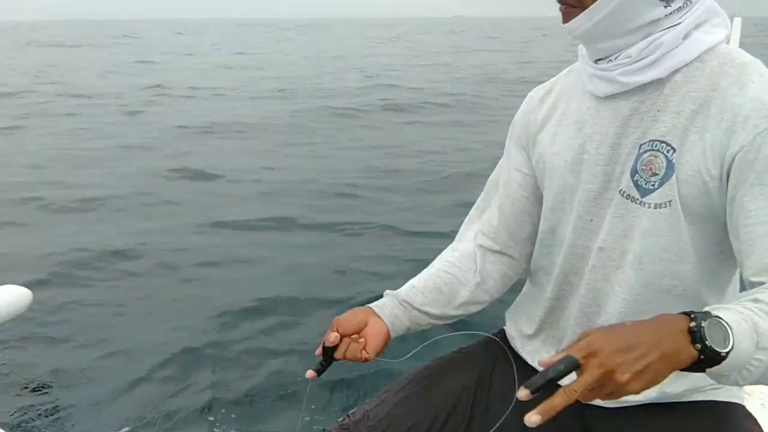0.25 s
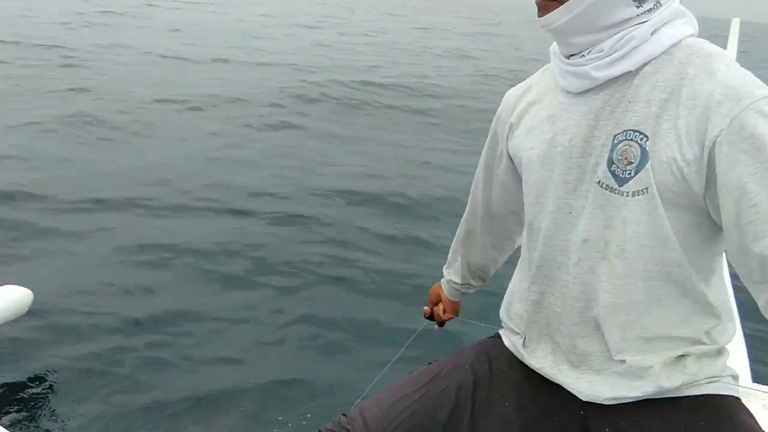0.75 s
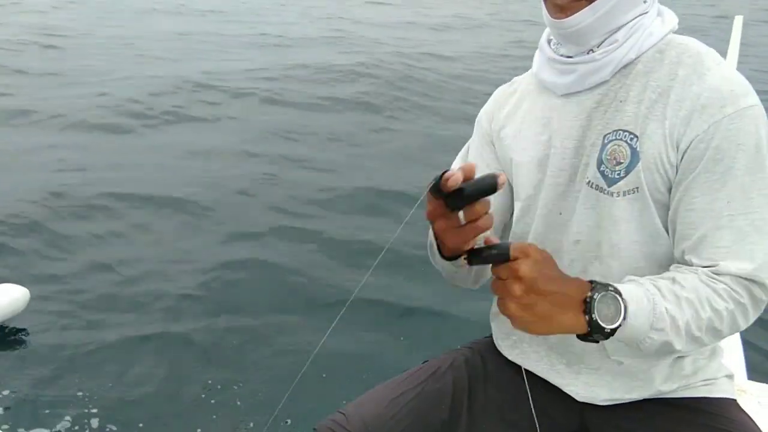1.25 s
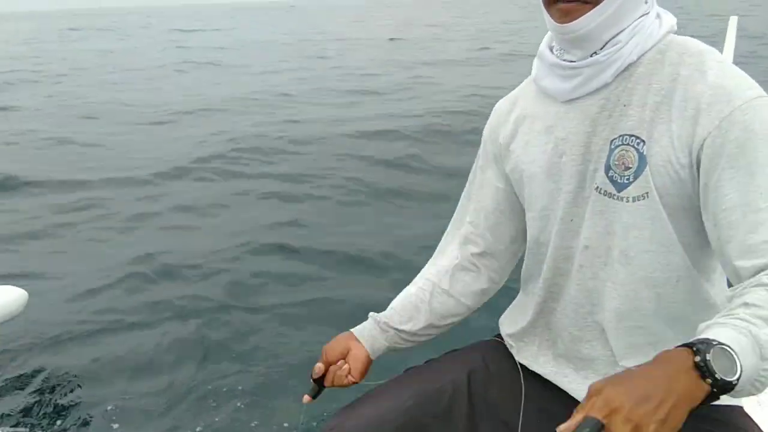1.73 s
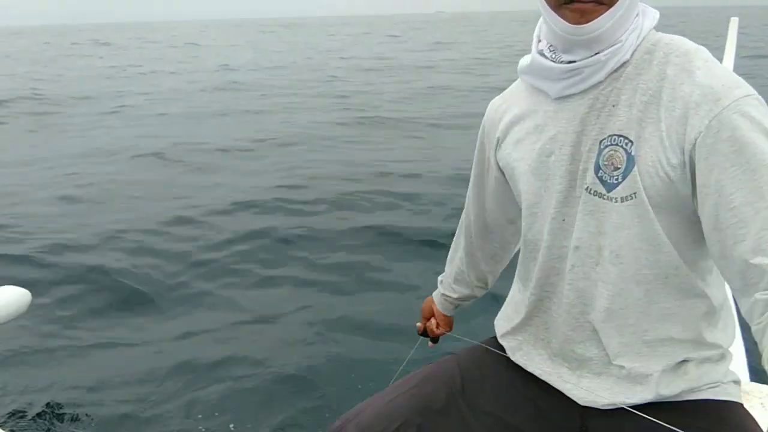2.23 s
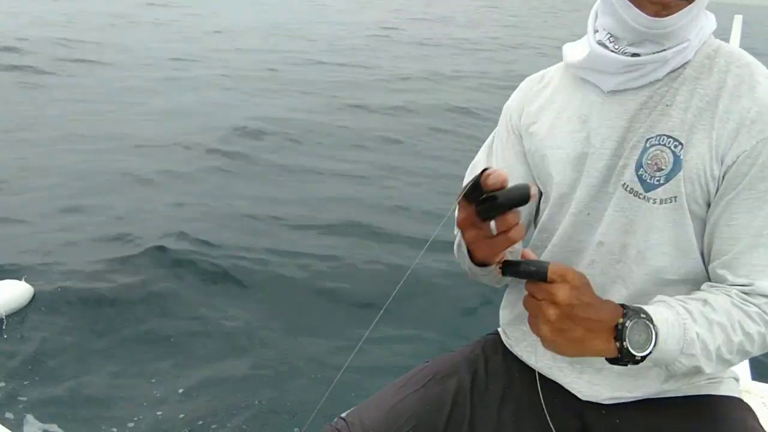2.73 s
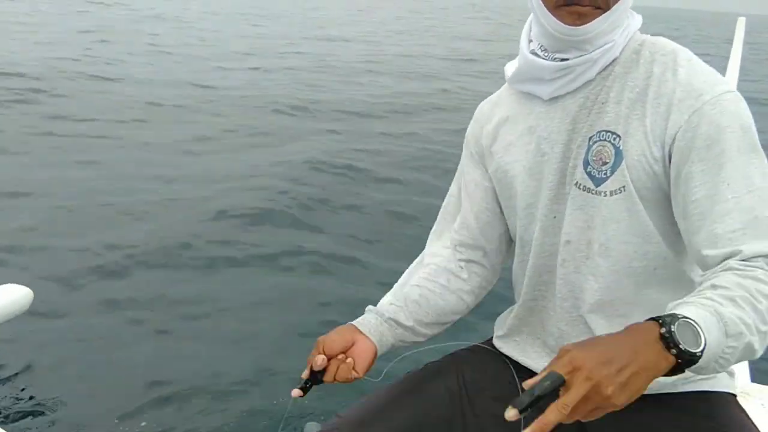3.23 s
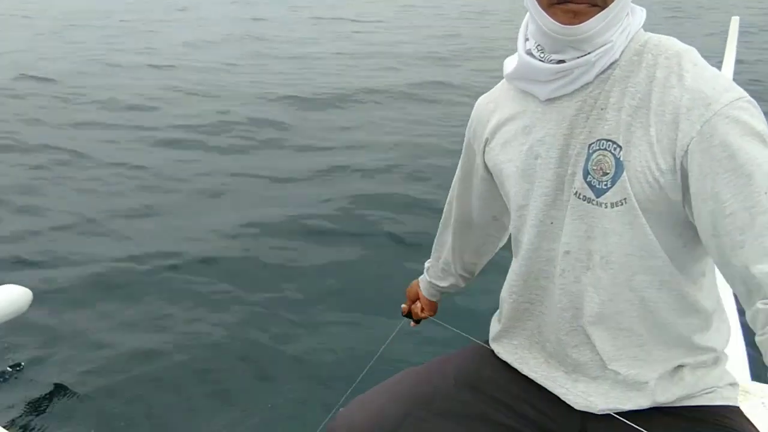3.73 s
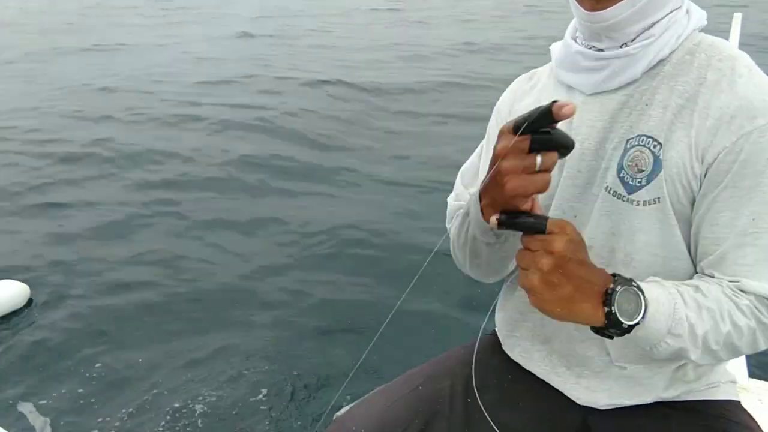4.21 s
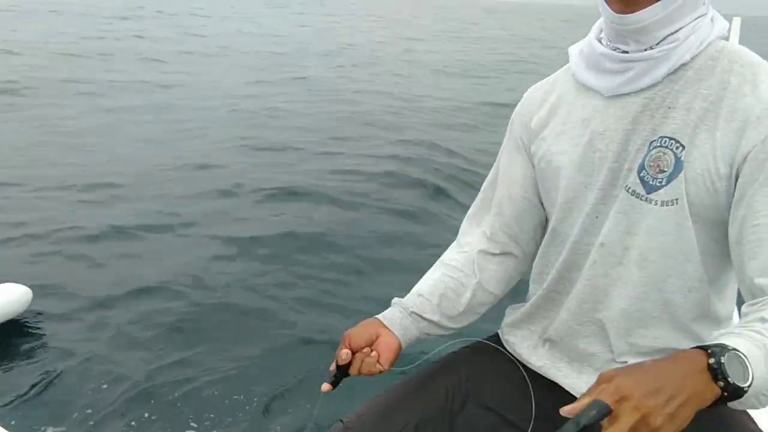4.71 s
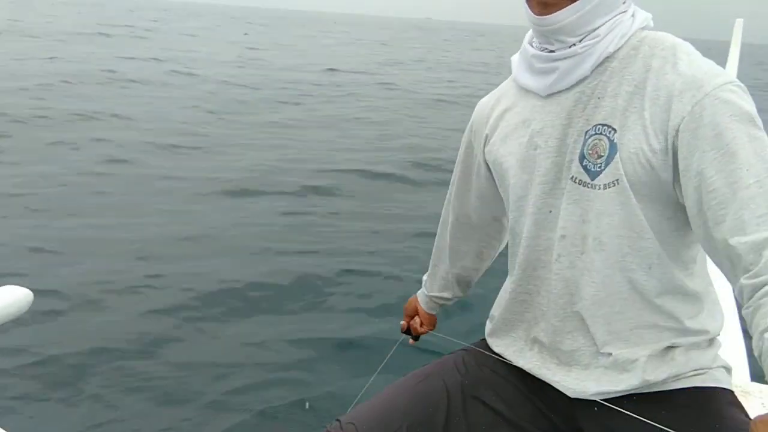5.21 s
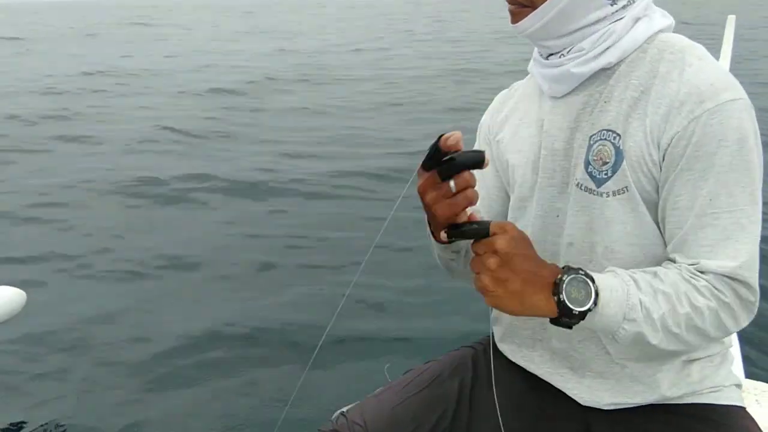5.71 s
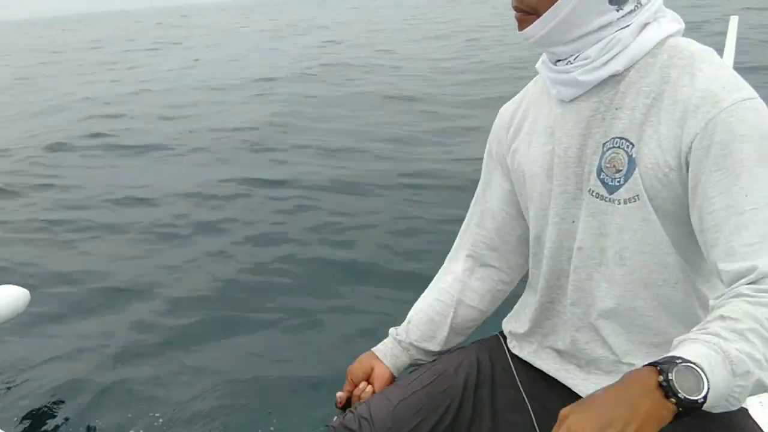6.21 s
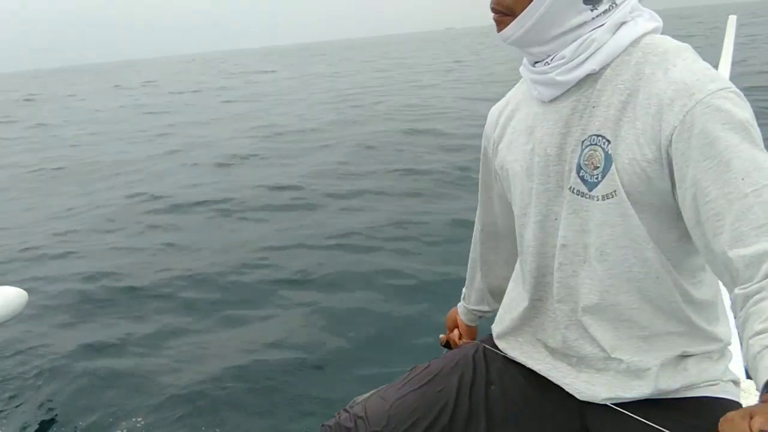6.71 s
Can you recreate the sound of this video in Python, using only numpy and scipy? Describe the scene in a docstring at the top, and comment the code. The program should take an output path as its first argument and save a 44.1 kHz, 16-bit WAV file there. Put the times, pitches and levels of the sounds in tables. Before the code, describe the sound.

Sea water sloshes and trickles against a small boat while a wet line is pulled in with quick, uneven swishes. Each pull brings a fizzy hiss and a gurgle, mixed with scattered drips, bubble plops and a few brief splashes. Small waves knock softly on the hull over a faint low hum. The sound comes from a single small, bright microphone, with the water briefly dropping away between some pulls.

```python
"""Wet swishes, near three a second, as a line is hauled hand over hand beside a small boat.
Spray hisses and crackles, air pockets gurgle and wavelets slap the hull: each is a bed of noise with
bubbles ringing in it. Single large bubbles plop, bursting drops tick, and a low hum wavers underneath.
The background water dips suddenly and deeply at times, as from a noise gate.
One small microphone, bright near 8 kHz, a peak that is built into the spray's tone."""
import sys
import numpy as np
from scipy import signal
from scipy.fft import rfft, irfft, next_fast_len
from scipy.io import wavfile
from scipy.ndimage import uniform_filter1d, map_coordinates

SR = 44100
rng = np.random.default_rng(int(sys.argv[2]) if len(sys.argv) > 2 else 0)


def generate_wav(signal):
    """Clip the signal to [-1, 1] and save it as 16-bit WAV at the path in sys.argv[1]."""
    frames = np.transpose(np.atleast_2d(signal))
    scaled = np.clip(frames, -1, 1) * 32767
    pcm = np.round(scaled).astype(np.int16)
    wavfile.write(sys.argv[1], SR, pcm)


N = 306495

# tone of the spray and of each drop's puff: (frequency [Hz], relative level [dB])
SPRAY_SPECTRUM = [(880, -23.5), (1500, -12), (2200, -8.5), (3020, -8.5), (4300, -5.5), (5040, -7.5),
                  (6200, -6.5), (7930, 2.5), (9560, -6.5), (11100, -11.5), (14000, -29.5), (15800, -27)]


def amp(db):
    return 10 ** (np.asarray(db) / 20)


def unit(x):
    return x / np.sqrt(np.mean(x ** 2) + 1e-20)


def curves(rows):
    """One value per sample for each column after the time."""
    times, *columns = np.transpose(rows)
    return [np.interp(np.arange(N) / SR, times, column) for column in columns]


def wobble(rate):
    """A smooth random curve, rate knots a second."""
    return map_coordinates(rng.standard_normal(int(N * rate / SR) + 4), [np.arange(N) * rate / SR])


def filtered(x, response):
    """x through an EQ whose gain is response(hz)."""
    size = next_fast_len(N + 8192)
    return irfft(rfft(x, size) * response(np.fft.rfftfreq(size, 1 / SR)), size)[..., :N]


def coloured(x, spectrum):
    """x through (frequency [Hz], level [dB]) points on a log axis, scaled to rms 1."""
    points_hz, db = np.transpose(spectrum)
    return unit(filtered(x, lambda hz: amp(np.interp(np.log(hz + 1), np.log(points_hz), db, -120, -120))))


def patchy(patchy_db, banded_db):
    """White noise with brief patches of random gain, and narrow bands that rise and sink more slowly."""
    noise = signal.stft(rng.standard_normal(N), nperseg=256)[2]

    def blur(bins, frames):
        field = rng.standard_normal(noise.shape)
        return unit(uniform_filter1d(uniform_filter1d(field, bins, 0), frames, 1))

    gain = amp(patchy_db * blur(bins=5, frames=5)) * amp(banded_db * blur(bins=2, frames=30))
    return unit(signal.istft(noise * gain, nperseg=256)[1][:N])


def rings(start, gain, hz, life, glide, size):
    """Bubble tones, size samples long, that start fast and fade; pitch moves by the share glide per life."""
    start, gain, hz, life, glide = (np.reshape(v, (-1, 1)) for v in (start, gain, hz, life, glide))
    t = np.arange(size) / SR
    envelope = (1 - np.exp(-t * hz / 0.58)) * np.exp(-(t / life) ** 2)
    wave = gain * envelope * np.sin(2 * np.pi * hz * t * (1 + .5 * glide * t / life))
    at = (start * SR).astype(int) + np.arange(size)
    return np.bincount(at.ravel(), wave.ravel(), N + size)[:N]


def swarm(count, hz, octaves, cycles, spread_db, size):
    """Scattered bubbles of log-normal pitch, life and strength; most glide slightly upward."""
    start = rng.random(count) * N / SR
    detune, stretch, strength, bend = rng.standard_normal((count, 4)).T
    pitch = np.clip(hz * 2 ** (octaves * detune), 150, 13000)
    life = np.minimum(cycles * 2 ** (.5 * stretch) / pitch, size / SR / 3)
    return unit(rings(start, amp(spread_db * strength), pitch, life, 0.044 + 0.085 * bend, size))


def surges(count, t60):
    """A level curve of small splashes: each jumps up at once and drains away; mean 0, rms 1."""
    position, strength = rng.random((count, 2)).T
    kicks = np.bincount((position * N).astype(int), strength, N)
    level = signal.fftconvolve(kicks, amp(-60 * np.arange(SR // 4) / SR / t60))[:N]
    return unit(level - level.mean())


def crests(times, db, rise, drain):
    """Envelope of events, summed in power: each climbs 20 dB in rise seconds and sinks 20 dB in drain."""
    roundness = 1.017  # 1 = pointed crest, 2 = round
    grid = np.arange(0, N / SR + .01, .001)
    late = grid - np.asarray(times)[:, None]
    span = np.where(late < 0, np.reshape(rise, (-1, 1)), np.reshape(drain, (-1, 1)))
    gain = amp(np.asarray(db)[:, None] - 20 * (abs(late) / np.maximum(span, .002)) ** roundness)
    return np.interp(np.arange(N) / SR, grid, np.sqrt((gain ** 2).sum(axis=0)))


def hum():
    """A narrow low rumble that flutters under the water."""
    # the rumble's fader: (time [s], level [dB])
    fader = [(0.0, -59.5), (2.09, -57), (2.96, -63.5), (3.72, -54), (3.79, -60), (4.7, -69.5), (4.74, -58),
             (5.34, -62.5), (5.4, -56), (6.04, -72), (6.14, -63), (6.46, -62), (6.52, -68), (6.95, -71)]
    # its tone: (frequency [Hz], relative level [dB])
    spectrum = [(22, -52.5), (42, -32.5), (52, -13.5), (90, -10), (122, -1.5), (145, -1.5), (190, -6),
                (225, -24.5), (400, -43)]
    return amp(curves(fader)[0] + 1.1 * wobble(rate=14)) * coloured(rng.standard_normal(N), spectrum)


def ticks():
    """A bursting drop throws a cluster of tiny bubbles around one pitch, and a short puff of spray."""
    # drops bursting: (time [s], level [dB], centre pitch [Hz])
    drops = [(0.0489, -21.5, 7150), (0.281, -34, 7000), (0.6065, -40, 3000), (0.8106, -26, 7100),
             (0.825, -16, 6900), (0.836, -22.5, 6200), (0.8415, -16, 7040), (0.9193, -19, 3720),
             (0.9632, -26, 5150), (0.966, -15, 4040), (1.016, -29, 6650), (1.0874, -17, 4340),
             (1.1244, -23, 8200), (1.2525, -19.5, 4800), (1.3022, -18, 6000), (1.3682, -14, 6430),
             (1.642, -27, 2540), (1.904, -31, 5000), (2.0394, -25, 7750), (2.184, -24.5, 7300),
             (2.3223, -27.5, 4840), (2.381, -25.5, 6600), (2.5617, -18.5, 7100), (2.584, -9.5, 6660),
             (2.5898, -15, 8000), (2.6236, -21.5, 7800), (2.647, -20.5, 6100), (2.652, -22, 7000),
             (2.6582, -16, 6030), (2.7041, -16, 7140), (2.72, -21, 5600), (2.727, -21, 6350),
             (2.746, -21.5, 4920), (2.754, -28, 5950), (2.7566, -13, 3610), (2.8551, -28, 6000),
             (3.0122, -32, 5040), (3.1928, -29.5, 4500), (3.215, -21, 10200), (3.3813, -26.5, 4690),
             (3.6323, -31.5, 4540), (3.669, -24.5, 7750), (4.137, -8, 6170), (4.148, -18, 5850),
             (4.1516, -10, 6700), (4.174, -11, 6350), (4.178, -6.5, 4230), (4.1944, -10.5, 4640),
             (4.231, -27.5, 7660), (4.3297, -29.5, 7100), (4.382, -29, 2080), (4.406, -18, 7260),
             (4.5274, -22, 3780), (4.531, -18, 6640), (4.5919, -39, 2860), (4.7748, -25, 6570),
             (4.7978, -12.5, 5400), (4.8064, -22.5, 7100), (4.8192, -15.5, 6260), (4.8298, -17, 4400),
             (4.832, -15, 4220), (4.8382, -9.5, 6040), (4.8496, -17, 4670), (5.033, -25, 6750),
             (5.065, -33, 8000), (5.215, -28, 7800), (5.2336, -19.5, 8200), (5.352, -34, 6770),
             (5.36, -26, 2930), (5.3667, -31.5, 6740), (5.4876, -29, 5330), (5.5056, -30.5, 6300),
             (5.8355, -31, 7700), (5.8389, -30, 4440), (5.909, -27, 7690), (6.0092, -36.5, 7200),
             (6.252, -34, 3430), (6.259, -22, 3650), (6.2654, -14.5, 6380), (6.2676, -23.5, 4580),
             (6.5865, -36, 5400), (6.748, -31.5, 4230)]
    bubbles_per_drop, ring_cycles, puff_t60 = 14, 2.9, 0.0095
    start, db, hz = (np.repeat(column, bubbles_per_drop) for column in np.transpose(drops))
    life = ring_cycles / hz
    delay = 1.6 * rng.random(len(start)) * life
    pitch = np.clip(hz * 2 ** (0.467 * rng.standard_normal(len(start))), 900, 13000)
    cluster = rings(start + delay, amp(db - 14), pitch, life, glide=0, size=400)
    softened = filtered(cluster, lambda f: 1 / (1 + (f / 9500) ** 6))
    kicks = np.bincount((start * SR).astype(int), amp(db - 38.5), N)
    puff = signal.fftconvolve(kicks, amp(-60 * np.arange(SR // 10) / SR / puff_t60))[:N]
    return softened + puff * coloured(rng.standard_normal(N), SPRAY_SPECTRUM)


def plops():
    """Each large bubble clicks as it pinches off and rings at its own pitch."""
    # single air bubbles: (time [s], level [dB], pitch [Hz], life [s], glide [share of pitch])
    bubbles = [(0.091, -38.5, 920, 0.024, 0.051), (0.277, -46, 924, 0.025, -0.13),
               (0.345, -45.5, 615, 0.031, -0.062), (0.663, -47.5, 800, 0.045, -0.17),
               (0.871, -47.5, 288, 0.05, -0.28), (0.93, -46.5, 189, .04, -0.039),
               (1.01, -37, 700, 0.016, 0.056), (1.087, -43.5, 501, 0.028, 0.097),
               (1.186, -44.5, 561, 0.066, 0.5), (1.215, -44, 476, 0.029, -0.013),
               (1.342, -34.5, 1126, 0.025, 0.11), (1.58, -52, 335, 0.052, -0.03),
               (1.641, -32, 2500, 0.0059, -0.015), (1.897, -48, 832, 0.04, 0.0058),
               (1.973, -34, 2200, 0.0042, 0.035), (2.002, -42, 401, 0.03, 0.2),
               (2.072, -42.5, 990, 0.019, -0.0039), (2.16, -31, 810, 0.012, -0.033),
               (2.181, -30.5, 1530, 0.0049, -0.19), (2.363, -34.5, 1290, 0.0035, 0.031),
               (2.532, -39.5, 649, 0.021, -0.11), (2.651, -37.5, 2130, 0.02, 0.042),
               (2.665, -40.5, 562, 0.017, 0.2), (2.701, -35.5, 706, 0.021, 0.02),
               (2.946, -46.5, 850, 0.022, -0.076), (3.123, -40, 745, 0.0064, -0.092),
               (3.211, -35, 970, 0.01, 0.11), (3.256, -40, 650, 0.01, -0.1),
               (3.278, -42.5, 1100, 0.013, 0.054), (3.492, -43.5, 900, 0.017, 0.032),
               (3.53, -42, 2500, .008, 0.15), (3.575, -45, 2300, 0.0089, -0.015),
               (3.634, -42.5, 606, 0.023, -0.27), (3.64, -38, 267, 0.028, -0.098),
               (3.804, -41.5, 2270, 0.0083, 0.051), (4.053, -54, 910, 0.023, 0.048),
               (4.15, -30, 1370, 0.0048, -0.0065), (4.175, -38, 1060, 0.015, -0.0064),
               (4.183, -36.5, 530, 0.017, 0.0063), (4.225, -51, 378, 0.073, 0.56),
               (4.292, -55.5, 2390, 0.012, 0.38), (4.381, -40, 710, 0.022, 0.094),
               (4.405, -31, 736, 0.025, -0.074), (4.455, -39.5, 950, 0.011, 0.033),
               (4.462, -45, 2430, 0.016, 0.056), (4.589, -44, 2260, 0.009, 0.59),
               (4.797, -50.5, 814, 0.063, -0.33), (4.973, -42.5, 1190, 0.014, 0.062),
               (5.363, -41, 1250, 0.0083, 0.087), (5.427, -42, 1280, 0.0067, 0.37),
               (5.5, -53, 303, .025, -0.21), (5.515, -45.5, 1250, .01, .05),
               (5.545, -44, 2390, 0.0099, 0.12), (5.57, -52.5, 787, 0.046, -0.14),
               (5.652, -46, 1130, 0.013, 0.012), (5.795, -45.5, 1400, 0.0084, -0.066),
               (5.86, -54.5, 676, 0.022, 0.31), (5.917, -42, 3450, 0.0085, 0.0032),
               (6.01, -63, 644, 0.03, 0.5), (6.105, -45.5, 289, 0.025, 0.19),
               (6.256, -35.5, 223, 0.014, 0.026), (6.595, -47.5, 756, 0.025, 0.11),
               (6.833, -41.5, 435, 0.019, 0.075)]
    start, db, hz, life, glide = np.transpose(bubbles)
    click = rings(start, amp(db - 7.5), 2.7 * hz, life=1.4 / hz, glide=0, size=400)
    return click + rings(start, amp(db), hz, np.clip(life, .004, .08), glide, size=6000)


def hull_slaps(churn):
    """Wavelets slap the hull with low noise and glugs; a share of the gurgle's churn shakes it too."""
    # wavelets landing: (crest time [s], level [dB], rise [s], drain [s])
    wavelets = [(0.094, -56, .09, 0.055), (0.902, -51, 0.19, .28), (1.229, -72, .08, 0.069),
                (1.6, -55.5, 0.41, 0.36), (2.393, -58.5, 0.42, 0.047), (2.71, -56, 0.085, 0.14),
                (3.003, -75, 0.033, .15), (3.219, -58, 0.023, 0.053), (3.464, -73, 0.034, 0.13),
                (3.642, -43.5, 0.014, 0.16), (4.252, -58, 0.38, 0.14), (4.839, -66, .04, 0.067),
                (5.26, -62, .015, 0.053), (5.5, -65.5, .015, 0.073), (6.104, -53.5, .015, 0.18),
                (6.257, -48, 0.0084, 0.17), (6.836, -50, 0.15, 0.15)]
    # the slap's hollow tone: (frequency [Hz], relative level [dB])
    spectrum = [(120, -32), (200, -5.5), (260, -5.5), (400, 2.5), (600, 5.5), (1200, -36)]
    glugs = swarm(count=450, hz=321.5, octaves=0.57, cycles=3.2, spread_db=2.5, size=2400)
    body = coloured(0.7 * patchy(patchy_db=-1.0, banded_db=-7) + 0.16 * glugs, spectrum)
    envelope = crests(*np.transpose(wavelets)) + amp(-26) * churn
    return envelope * amp(0.29 * wobble(rate=30)) * body


def gurgle():
    """Air pockets churn: patchy midrange noise with bubbles ringing in it."""
    # the gurgle's tone: (frequency [Hz], relative level [dB])
    spectrum = [(300, -55.5), (520, -11.5), (720, -2.5), (1200, -1), (2000, -4.5), (3000, -12.5),
                (5000, -47.5), (15800, -43)]
    bubbles = swarm(count=1300, hz=893.0, octaves=0.93, cycles=6.5, spread_db=3, size=2000)
    return coloured(1.01 * patchy(patchy_db=5.5, banded_db=3.0) + 0.2 * bubbles, spectrum)


def spray():
    """Hiss crackling with tiny bubbles and ringing droplets; the treble drifts and the level flickers."""
    # high shelf on the spray: (time [s], gain [dB])
    shelf = [(0, 0), (0.7, 2), (1.3, -0.5), (1.8, -2.5), (2.4, 2), (3.0, -0.5), (3.7, 2), (4.2, 1.5),
             (4.8, -3), (5.2, 3), (5.9, 4), (6.3, 1.5), (6.95, -3)]
    shelf_hz = 6000
    fizz = swarm(count=12000, hz=5500, octaves=.8, cycles=4, spread_db=4, size=200)
    droplets = swarm(count=2000, hz=4028, octaves=0.806, cycles=20.3, spread_db=2.0, size=900)
    noise = patchy(patchy_db=3.5, banded_db=3.5)
    hiss = coloured(0.56 * noise + 0.5 * fizz + 0.36 * droplets, SPRAY_SPECTRUM)
    treble = filtered(hiss, lambda hz: 1 / (1 + (shelf_hz / (hz + 1)) ** 6))
    flicker = amp(2.2 * wobble(rate=110))
    return flicker * (hiss + (amp(curves(shelf)[0]) - 1) * treble)


def hauling():
    """Envelopes of spray and gurgle: background water, the line's swishes and splashes add in power."""
    # background water between swishes, with sudden deep dips as from a noise gate:
    # (time [s], spray level [dB], gurgle level [dB])
    background = [(0, -63.5, -56), (0.2, -70, -73), (0.62, -79, -70), (0.648, -56.5, -55.5),
                  (1.4, -45, -47.5), (2.2, -51, -57.5), (2.45, -64, -63), (2.8, -59, -57.5),
                  (3.6, -66, -58), (3.96, -93, -64), (4.0, -54, -55), (4.6, -60, -67.5), (4.7, -76, -72),
                  (4.9, -54.5, -59.5), (5.75, -79, -70.5), (6.2, -86, -75.5), (6.572, -96, -78),
                  (6.602, -55, -52.5), (6.95, -53, -54.5)]
    # pulls on the wet line: (crest time [s], spray level [dB], gurgle level [dB], rise [s], drain [s])
    swishes = [(0.0, -39, -55.5, .05, 0.064), (0.11, -64.5, -52.5, 0.092, 0.075),
               (0.33, -49.5, -51, 0.18, 0.22), (0.48, -55.5, -55, 0.25, 0.087),
               (0.75, -40.5, -71, 0.11, 0.054), (0.95, -47, -76, 0.097, 0.67), (1.2, -47, -51.5, 0.45, .2),
               (1.37, -39, -45.5, 0.18, 0.19), (1.8, -42, -46, 0.26, 0.16),
               (2.187, -46.5, -47.5, 0.35, 0.39), (2.53, -50.5, -58, 0.045, 0.44),
               (2.955, -41, -61.5, 0.14, 0.17), (3.287, -43.5, -53.5, .15, .15),
               (3.537, -56.5, -47.5, 0.03, 0.058), (3.74, -51.5, -47.5, 0.21, 0.19),
               (4.039, -57, -48.5, 0.042, 0.19), (4.472, -39.5, -52.5, 0.092, 0.058),
               (4.99, -60.5, -58.5, 0.044, 0.61), (5.11, -51, -48, 0.047, 0.17),
               (5.236, -50, -57, 0.25, 0.065), (5.4, -61, -59.5, .05, 0.14), (5.543, -46, -53, .07, 0.097),
               (5.657, -62.5, -53.5, .15, 0.086), (5.764, -67.5, -54.5, 0.035, 0.069),
               (5.939, -43.5, -65, 0.082, 0.086), (6.262, -40.5, -43.5, 0.012, 0.12),
               (6.679, -43.5, -58, 0.063, 0.3)]
    # brief splashes: (crest time [s], spray level [dB], gurgle level [dB])
    splashes = [(0.834, -36.5, -61), (2.175, -54, -38), (2.584, -34, -54), (2.66, -33, -40),
                (2.715, -40.5, -37), (2.75, -29, -43.5), (3.205, -57, -67), (4.146, -37, -55),
                (4.182, -32.5, -37.5), (4.389, -62, -47), (4.531, -49, -61), (4.797, -34.5, -48.5),
                (4.836, -37.5, -46.5), (5.362, -49, -60), (5.843, -58, -70), (6.099, -62.5, -52.5)]
    swish_times, *swish_levels, rise, drain = np.transpose(swishes)
    splash_times, *splash_levels = np.transpose(splashes)
    envelopes = []
    for background_db, swish_db, splash_db in zip(curves(background), swish_levels, splash_levels):
        swish = crests(swish_times, swish_db, rise, drain)
        splash = crests(splash_times, splash_db, rise=0.033, drain=0.033)
        envelopes.append(np.sqrt(amp(background_db) ** 2 + swish ** 2 + splash ** 2))
    return envelopes


def wash():
    """The wet line's spray and gurgle, tossed by the same small splashes, over the hull slaps."""
    toss = surges(count=330, t60=0.18)
    spray_gain, churn = hauling()
    return (spray_gain * amp(2.08 * toss) * spray()
            + churn * amp(1.24 * toss) * gurgle()
            + hull_slaps(churn))


def scene():
    return (wash() + plops() + ticks() + hum())[None]


def record(dry):
    """A brick-wall band limit cuts the very top."""
    top_hz = 15830
    return filtered(dry, lambda hz: hz < top_hz)


dry = scene()
out = record(dry)
generate_wav(out)
```